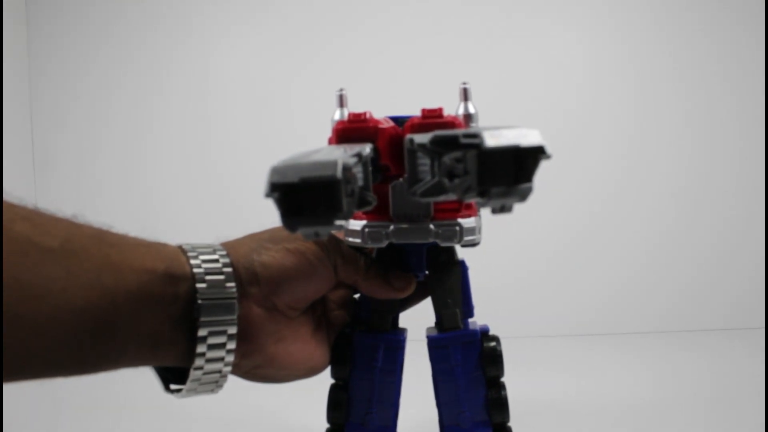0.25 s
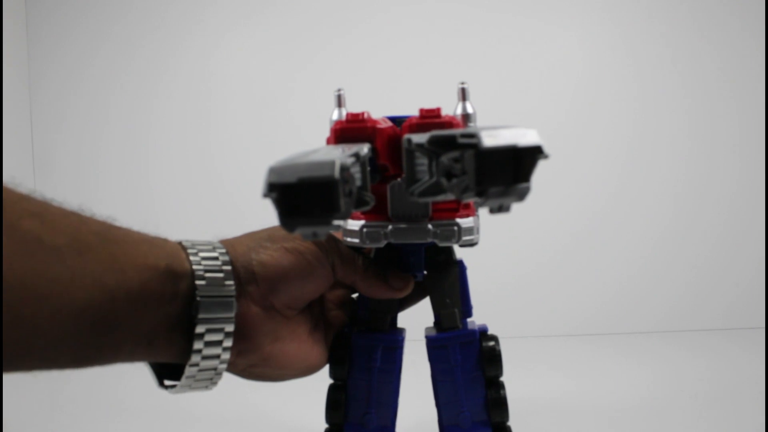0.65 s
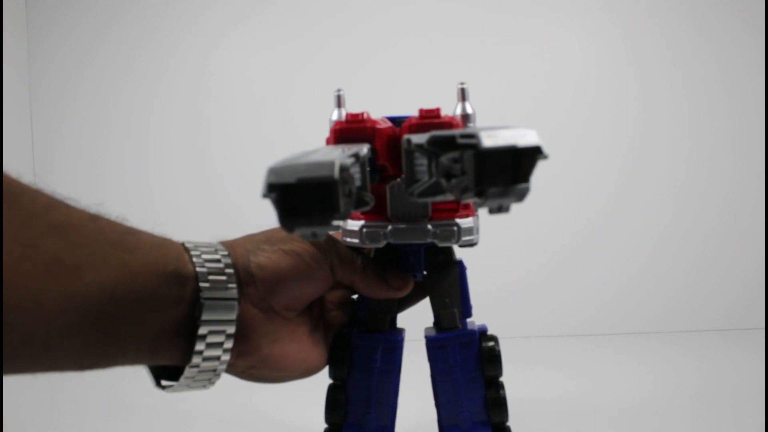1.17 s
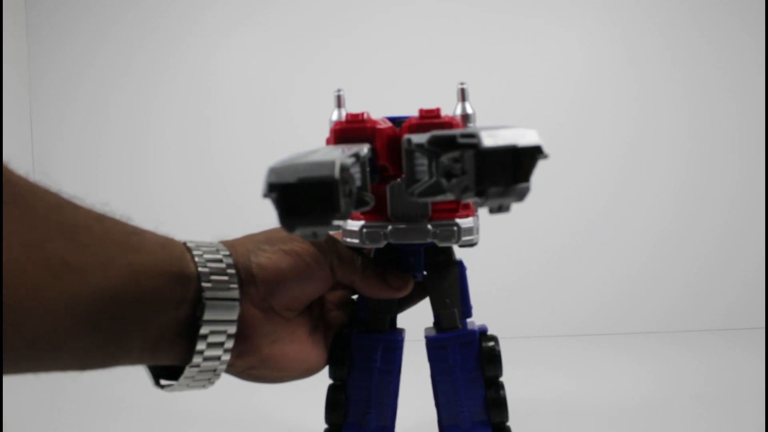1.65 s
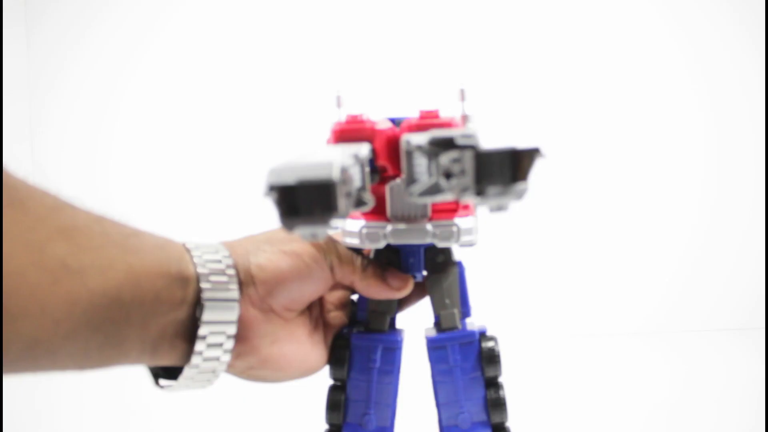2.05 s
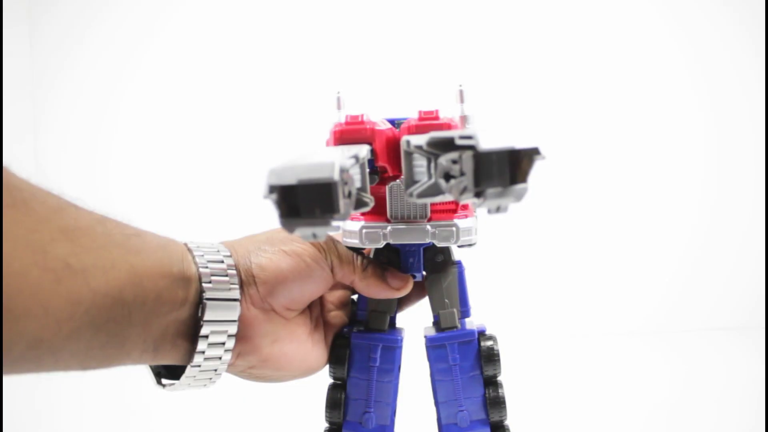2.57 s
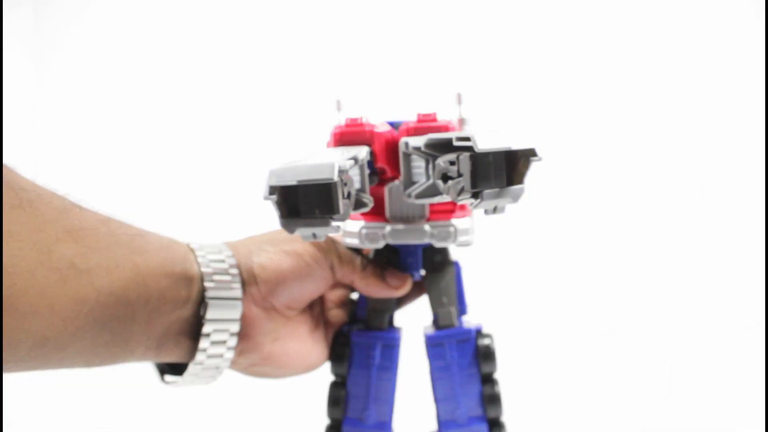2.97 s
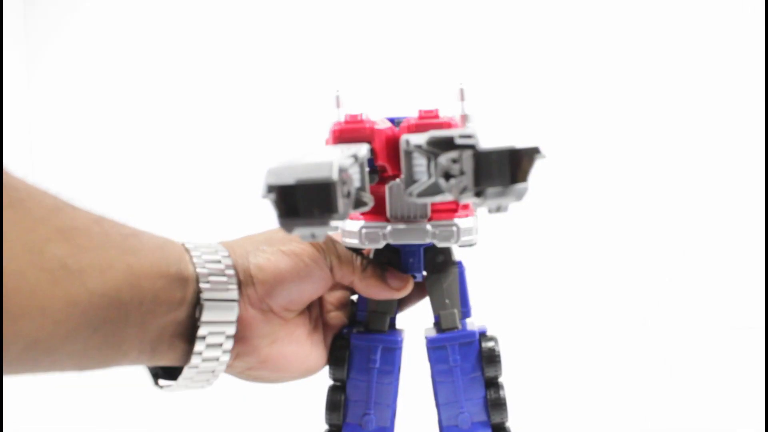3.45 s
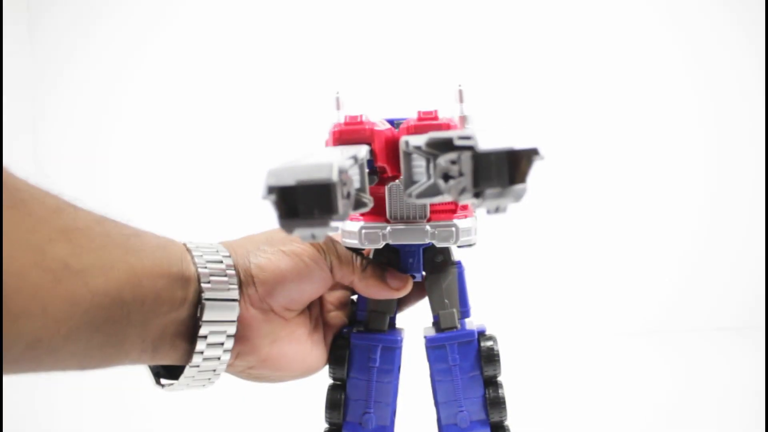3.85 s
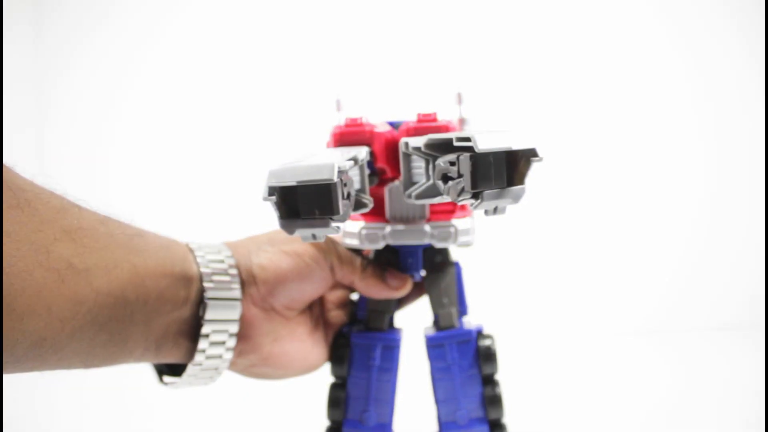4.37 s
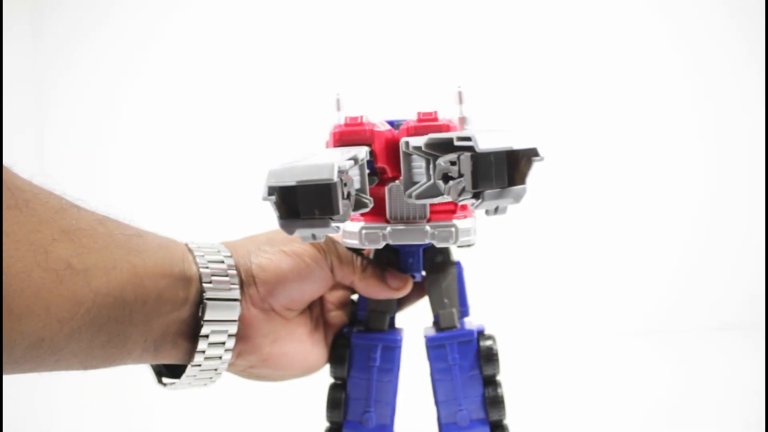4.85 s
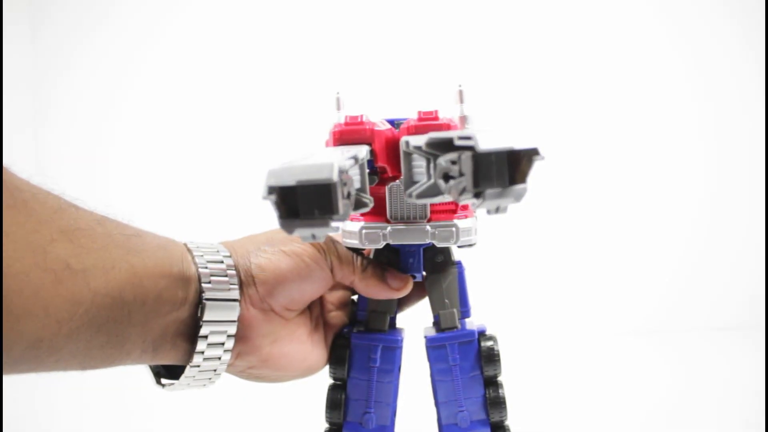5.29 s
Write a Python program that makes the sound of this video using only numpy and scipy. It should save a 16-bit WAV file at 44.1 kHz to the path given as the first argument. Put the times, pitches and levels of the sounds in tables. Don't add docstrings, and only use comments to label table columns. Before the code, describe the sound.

A loud plastic button snap, faint finger rubs, a switch click, then a small geared lens motor whirring and stuttering in a quiet room.

```python
import sys
import numpy as np
from scipy import signal
from scipy.fft import rfft, irfft, next_fast_len
from scipy.io import wavfile
from scipy.ndimage import uniform_filter1d, map_coordinates

SR = 44100
rng = np.random.default_rng(int(sys.argv[2]) if len(sys.argv) > 2 else 0)


def inscribe(sig):
    pcm = np.round(np.clip(np.atleast_2d(sig).T, -1, 1) * 32767)
    wavfile.write(sys.argv[1], SR, pcm.astype(np.int16))


def volts_from_decibels(level):
    exponent = np.asarray(level, float) / 20
    return 10 ** exponent


N = 243678
T = np.arange(N) / SR
TOP_HZ = 15500

# frequency in Hz, level in dB per Hz.
HUSH_SPECTRUM = [(15, -56.5), (25, -39.5), (87, -20.5), (130, -9.5), (196, -13), (355, -9.5), (386, -13),
                 (479, -10), (534, -12.5), (1080, -13), (5630, -23), (9950, -26.5), (12000, -27.5),
                 (13800, -22), (16200, -53)]
HUSH_DB = -68
# frequency in Hz, level in dB.
CLOCK_TONES = [(361, -82), (5000, -95), (6000, -93), (8000, -89), (9000, -89), (10000, -88), (11000, -92),
               (13000, -94), (14000, -90)]
# frequency in Hz, t60 in seconds.
ROOM_DECAY = [(150, 0.41), (1000, 0.23), (4000, 0.17), (12000, 0.15)]
WALLS_DB = -16.5
# start in seconds, end in seconds.
DROPOUTS_S = [
    (2.002, 2.022),
    (3.601, 3.622),
]

# time in seconds, middle in dB, body knock in dB, treble in dB.
SMALL_TICKS = [(.248, -50, -45.5, -42), (.642, -52.5, -59.5, -66.5), (.684, -49.5, -58, -66),
               (.708, -46.5, -64, -65), (.903, -58, -44, -48), (.979, -49, -57.5, -54),
               (1.714, -75.5, -72, -54.5), (1.81, -64.5, -47, -51), (1.814, -60, -68, -43.5),
               (1.841, -58, -70, -51), (1.849, -72, -68, -52), (1.887, -63, -64, -52),
               (1.938, -56, -54, -44), (2.026, -67, -56.5, -80), (2.272, -44, -44.5, -35),
               (2.773, -61.5, -45, -35.5), (2.784, -60, -41, -38), (3.952, -47, -52, -54),
               (4.595, -59.5, -51, -62), (4.683, -56, -55, -54.5), (3.175, -51, -48, -36),
               (3.182, -55, -60, -38), (3.194, -43, -30.5, -46), (3.808, -43, -60, -34.5),
               (4.442, -43.5, -42.5, -34.5), (5.411, -38, -44, -29.5), (5.513, -42.5, -50, -33),
               (.002, -59.5, -38, -61), (1.005, -54, -56, -62), (3.115, -46, -48, -66),
               (3.925, -59, -52, -72), (4.525, -64.5, -64, -76)]
# time in seconds, knock in dB, deep part in dB.
HOUSING_JOLTS = [
    (.249, -53, -54),
    (2.29, -39.5, -51),
    (2.778, -41.5, -78),
    (3.19, -39, -60),
    (3.825, -51, -57),
    (4.45, -61, -57),
    (5.43, -53, -56),
]

# time in seconds, peak in dB, rattle t60 in seconds, lead-in in dB, settling in dB.
BIG_SNAPS = [
    (.0112, 0, 0.014, -17.5, -17.5),
    (1.906, -17, 0.0059, -14.5, -32),
    (2.2869, -10.5, 0.023, -8.5, -16),
]
# lead-in before in seconds, build-up in seconds, rebound after in seconds, rebound in dB.
SNAP_CONTACTS = [
    (0.0014, 0.00035, 0.0022, -12.5),
    (.0005, 0.00035, .0078, -16),
    (.0015, 0.00025, 0.0022, -10),
]
# frequency in Hz, level in dB per Hz.
RATTLE_SPECTRA = [
    [(50, -40), (130, -4), (383, -10.5), (3160, -12), (4000, -8), (4820, -16.5), (5690, -18), (9310, -11.5),
     (13200, -17.5), (16300, -41)],
    [(120, -69), (200, -47), (615, -1), (1760, -23), (3060, -34.5), (4580, -31), (5720, -11), (6630, -33),
     (10700, -12.5), (16300, -59)],
    [(59, -74.5), (100, -48), (1500, -17), (2400, -5.5), (5390, -5), (7110, -12), (8990, -1), (13500, -33),
     (16300, -62)],
]
# frequency in Hz, level in dB, t60 in seconds.
BUTTON_MODES = [(350, -0.5, 0.011), (813, -8, 0.01), (1355, -14, 0.016), (1625, -7, 0.011),
                (2080, -8, 0.014), (2690, -9, 0.016), (3570, -1, 0.011), (3970, -3, 0.011),
                (5750, 4, 0.006), (7410, 5, 0.007), (9450, 9, 0.0064), (10470, -3, 0.0083),
                (11180, -7, .01), (13000, -5.5, 0.006)]
# frequency in Hz, level in dB, t60 in seconds.
SWITCH_MODES = [(528, 2.5, .014), (730, 9, 0.014), (955, 4, 0.0098), (1223, 17, 0.021), (1490, 2, 0.013),
                (1724, 19, 0.016), (2610, -3, 0.032), (3480, -3, 0.021), (5110, 4, 0.013), (5830, 3, 0.013),
                (9500, -12, .008), (10300, -9, .007)]
# frequency in Hz, level in dB, t60 in seconds.
STOP_MODES = [(1466, -3.5, 0.016), (2940, -7.5, 0.023), (3990, -4, 0.018), (5260, -6, 0.021),
              (6140, -1.5, 0.0085), (8850, 8, 0.0054), (10540, -5.5, 0.0076), (13100, 2, 0.0058)]

# time in seconds, rise in dB/s, fall in dB/s, hiss in dB, extra body in dB.
FINGER_SLIDES = [(.2, 244, 155, -62, 12), (.25, 298, 163, -61, 5), (0.297, 166.5, 1800, -57.5, -1),
                 (.955, 450, 182, -57, 0), (1.105, 600, 196, -70, 6), (1.154, 300, 602.5, -57, -2.5),
                 (1.276, 277, 335, -42, -1.5), (1.359, 150, 220, -61, 7), (1.445, 249, 302, -63.5, 5),
                 (1.53, 349, 116, -53.5, -3), (1.717, 350, 1999.5, -66, -3), (1.89, 900, 200, -70, -13),
                 (1.941, 282, 252.5, -54, 4), (3.627, 3000, 898, -72.5, 15)]
# frequency in Hz, level in dB per Hz.
SKIN_HISS_SPECTRUM = [(2000, -81), (3200, -26), (4700, -9.5), (5400, -4.5), (6450, -15.5), (8500, 0),
                      (10600, -3), (11500, -12), (14600, -8), (15500, -28.5)]
# frequency in Hz, level in dB per Hz.
SKIN_BODY_SPECTRUM = [(300, -70), (900, -3.5), (1500, 1), (2200, -3.5), (3000, -9), (4200, -9.5),
                      (5500, -44)]
# frequency in Hz, width in Hz, height in dB.
SHELL_PEAKS = [(1192, 30, 6.5), (1490, 80, 2), (2100, 68, -1), (5350, 260, 5), (10620, 440, 4.5),
               (14700, 320, -6)]
# frequency in Hz, level in dB per Hz.
GRIP_SPECTRUM = [(250, -64), (500, -18.5), (670, -9.5), (710, 1.5), (750, -8.5), (900, -31), (1200, -71.5)]
# time in seconds, rise in dB/s, fall in dB/s, level in dB, mode in Hz.
GRIP_HUMS = [
    (.235, 496, 300, -67, 713),
    (.295, 199.5, 1200, -57, 706),
    (1.251, 304, 160, -52, 1487),
    (1.272, 261, 500, -47, 713),
    (1.56, 121.5, 252, -60.5, 1198),
    (1.96, 201, 301, -63, 1200),
]
BODY_DB, BODY_GROWS = -57.5, 0.46
LIFT_DB = -70
ROUND_S = 0.0105

# start in seconds, end in seconds, take-up in seconds, low grind in dB, relative braking.
FORWARD_STROKES = [
    (2.267, 2.338, 0.0074, -43, 0.79),
    (2.87, 3.091, 0.033, -42.5, 1.12),
    (3.8, 3.875, 0.019, -41.5, 0.85),
    (3.937, 4.006, 0.028, -41, 0.97),
    (4.069, 4.112, 0.023, -42.5, 0.86),
    (5.407, 5.45, 0.0079, -40.5, 0.8),
    (5.509, 5.518, 0.012, -38.5, 0.9),
]
# start in seconds, end in seconds, take-up in seconds, low grind in dB, relative braking.
BACKWARD_STROKES = [
    (3.168, 3.476, 0.016, -41, 1.45),
]
# start in seconds, end in seconds, take-up in seconds, low grind in dB, relative braking.
JERK_STROKES = [
    (2.769, 2.786, 0.0065, -42.5, 1.82),
    (4.435, 4.452, 0.013, -41.5, 0.94),
]
# time in seconds, take-up in seconds, hold in seconds, low grind in dB.
FOCUS_NUDGES = [(4.563, 0.033, 0.027, -50.5), (4.665, 0.025, 0.024, -50), (4.798, 0.028, 0.022, -49),
                (4.899, 0.027, 0.02, -49), (4.997, 0.033, 0.023, -49.5), (5.096, 0.029, 0.023, -48.5),
                (5.194, 0.034, 0.018, -49.5), (5.292, 0.037, .022, -50.5)]
NUDGE_BRAKE = 1.6
# frequency in Hz, level in dB per Hz.
GRIND_SPECTRUM = [(29, -73), (50, -20), (130, -28.5), (382, -23.5), (607, -14), (693, -8.5), (817, -16),
                  (1480, -9), (2600, -25), (3380, -66), (5720, -120)]
# frequency in Hz, level in dB per Hz.
CHATTER_SPECTRUM = [(1180, -28.5), (2000, -10.5), (2750, -3), (3140, -5.5), (3920, -6.5), (4250, -5),
                    (5750, -10.5), (8000, -16), (10400, -111), (17600, -120)]
# frequency in Hz, level in dB per Hz.
RASP_SPECTRUM = [(3820, -22), (6500, -7), (8350, -7.5), (8790, -9), (10800, -2.5), (11500, -9.5),
                 (13500, -3), (15500, -21)]
# frequency in Hz, width in Hz, height in dB.
BARREL_PEAKS = [(775, 360, 4), (1145, 57, 8.5), (1727, 920, 14), (2767, 355, 11.5), (3880, 450, 10),
                (5420, 1060, 9), (8970, 250, 16), (9850, 300, 8), (10650, 220, 14), (12700, 400, -1),
                (13260, 390, 1.5), (2390, 59, 5.5)]
# frequency in Hz, width in Hz, height in dB.
HOUSING_DIPS = [(7080, 180, 1), (8450, 300, -2), (10200, 100, -6), (11250, 250, -14), (14000, 300, -10)]
# frequency in Hz, width in Hz, height in dB.
BARREL_SEATING = [
    [(405, 110, 2), (1550, 380, -1.5), (4400, 290, -4), (5290, 210, 3), (5900, 340, 3.5), (9800, 380, -5.5),
     (13300, 900, -5)],
    [(780, 130, -7), (2360, 49, 2), (5280, 500, -3.5), (9870, 200, 5), (11600, 540, 6), (13400, 500, 2.5)],
    [(620, 200, 6), (1410, 250, 4), (1880, 330, -3.5), (2720, 290, -9.5), (3500, 190, 2), (3840, 240, -3),
     (7700, 1300, 5.5), (9900, 600, 5)],
    [(724, 120, 3.5), (1610, 300, 1), (4030, 400, 2.5), (5700, 570, 4), (9000, 270, -3), (10630, 230, -2)],
]
WEAK_DB, FULL_DB = (-1, -9.5, -18.5), (0, 3, 0)
SPIN_UP_DB, SPIN_UP_S = (-3.5, -6, -13), (0.017, 0.023, 0.045)
COAST_DB_PER_S = (-400, -620, -950)
LOAD_DB, LOAD_GROWS = -41, (0, 0.03, 0.34)
STOP_S, STOP_DB_PER_S = 0.046, -900
TAKE_UP_DB, TAKE_UP_BEND = -31, 1.76
WHEEL_RATIO, WHEEL_DB, WHEEL_S = 5.2, -6.5, 3.303

# start in seconds, end in seconds, top speed in turns Hz, 3rd order in dB, upper orders in dB.
FREE_SPINS = [
    (2.886, 3.091, 234, -45, -55),
    (3.19, 3.476, 223.6, -42, -43),
    (3.817, 3.87, 240, -34, -44),
    (3.951, 4.006, 237, -37, -40),
    (4.066, 4.118, 245, -42, -52),
]
# multiple of the shaft speed, level in dB against the 5th order.
WEAKER_ORDERS = [(4, -9), (7, -16), (8, -10.5), (9, -13.5), (12, -8), (15, -5.5), (18, -8)]
LAG, SPEED_UP_S = .4, .036
SLOW_THIRD_DB, SLOW_FIFTH_DB = -135, -105
FADE_DB_PER_S, CUT_DB_PER_S = -700, -1400
LIGHT_S, GLIDE_DB_PER_S = .1, -480
MOUNT_HZ, MOUNT_WIDTH_HZ, OFF_MOUNT_DB = 1200, 240, -14


def unit(x):
    return x / np.sqrt(np.mean(x ** 2) + 1e-20)


def along(points, hz):
    f, v = np.transpose(points)
    return np.interp(np.log(hz + 1), np.log(f + 1), v)


def humps(hz, peaks):
    return sum(db / (1 + (2 * (hz - c) / w) ** 2) for c, w, db in peaks)


def wobble(rate):
    knots = rng.standard_normal(int(N * rate / SR) + 4)
    return map_coordinates(knots, [T * rate])


def filtered(x, response):
    m = next_fast_len(len(x) + SR)
    return irfft(rfft(x, m) * response(np.fft.rfftfreq(m, 1 / SR)), m)[:len(x)]


def coloured(x, spectrum, peaks=()):
    return unit(filtered(x, lambda f: volts_from_decibels(along(spectrum, f) + humps(f, peaks)) * (f < TOP_HZ)))


def burst(spectrum, t60, size=4096):
    cep = irfft(np.log(volts_from_decibels(along(spectrum, np.fft.rfftfreq(size, 1 / SR))) + 1e-6), size)
    cep[1:size // 2] *= 2
    cep[size // 2 + 1:] = 0
    noise = rng.standard_normal(size) * volts_from_decibels(-60 * T[:size] / t60)
    puff = irfft(rfft(noise) * np.exp(rfft(cep)), size)
    return puff / np.abs(puff).max()


def add(track, s, sound):
    part = track[round(s * SR):][:len(sound)]
    part += sound[:len(part)]


def room(x):
    hz, t, z = signal.stft(rng.standard_normal(SR // 2), SR, nperseg=256)
    decay = volts_from_decibels(-60 * t / along(ROOM_DECAY, hz)[:, None])
    tail = signal.istft(z * decay, SR, nperseg=256)[1]
    return signal.fftconvolve(x, tail / np.linalg.norm(tail))


def hush():
    tones = sum(np.sqrt(2) * volts_from_decibels(db + 0.7 * wobble(1.2)) * np.sin(2 * np.pi * hz * T) for hz, db in CLOCK_TONES)
    level = volts_from_decibels(HUSH_DB + 0.82 * wobble(1.88))
    return level * coloured(rng.standard_normal(N), HUSH_SPECTRUM) + tones


def ticks():
    middle = [(1300, -23.0), (2000, -10.5), (3300, -11.0), (4500, -35.0)]
    body = [(300, -31), (600, 4.5), (1200, 8), (1600, 13), (1900, 5.0), (2300, -30.5)]
    treble = [(4500, -38.5), (5600, 7.5), (6800, -7.5), (9500, 8.5), (14000, -31), (16000, -72)]
    deep = [(40, -48), (90, -4.5), (170, -3), (280, -4.5), (500, -40)]
    knock = [(60, -60), (170, -31), (280, -11.5), (380, -1.5), (520, -7), (800, -20), (1500, -37)]
    out = np.zeros(N)
    for s, db, knock_db, treble_db in SMALL_TICKS:
        add(out, s, volts_from_decibels(db) * burst(middle, t60=0.032))
        add(out, s, volts_from_decibels(knock_db) * burst(body, t60=0.045))
        add(out, s, volts_from_decibels(treble_db) * burst(treble, t60=0.026))
    for s, db, deep_db in HOUSING_JOLTS:
        add(out, s, volts_from_decibels(deep_db) * burst(deep, t60=0.034))
        add(out, s, volts_from_decibels(db) * burst(knock, t60=0.014))
    return filtered(out, lambda f: f < TOP_HZ)


def snaps():
    out, t = np.zeros(N), T[:4096]
    parts = zip(BIG_SNAPS, SNAP_CONTACTS, (BUTTON_MODES, SWITCH_MODES, STOP_MODES), RATTLE_SPECTRA)
    for (s, db, t60, lead_db, settle_db), (lead_s, build_s, back_s, back_db), modes, crack in parts:
        ring = sum(volts_from_decibels(level - 60 * t / ring_t60) * np.sin(2 * np.pi * hz * t + k * k)
                   for k, (hz, level, ring_t60) in enumerate(modes))
        ring *= (1 - np.exp(-t / build_s)) ** 2
        ring /= np.abs(ring).max()
        rattle = volts_from_decibels(db - 7.0) * burst(crack, t60)
        settling = volts_from_decibels(db + settle_db) * burst(crack, t60=0.038)
        add(out, s - lead_s, volts_from_decibels(db + lead_db) * burst(crack, t60=0.014))
        add(out, s, volts_from_decibels(db) * ring + rattle + settling)
        add(out, s + back_s, volts_from_decibels(db + back_db) * ring)
        add(out, s, volts_from_decibels(WALLS_DB) * room(rattle[:SR // 600]))
    return filtered(out, lambda f: (1j * f / (1j * f + 130)) ** 3)


def swell(s, rise, fall, db):
    gain = volts_from_decibels(db - np.where(T < s, rise, fall) * (np.hypot(T - s, ROUND_S) - ROUND_S))
    return gain * gain / (gain + volts_from_decibels(LIFT_DB))


def finger():
    slides = [swell(*row[:-1]) for row in FINGER_SLIDES]
    hiss = sum(slides)
    press = sum(volts_from_decibels(row[-1]) * slide for row, slide in zip(FINGER_SLIDES, slides))
    body = volts_from_decibels(BODY_DB) * (press / volts_from_decibels(-51.5)) ** BODY_GROWS
    body *= press / (press + volts_from_decibels(LIFT_DB))
    slips = volts_from_decibels(1.25 * wobble(400) + 1.5 * wobble(46.1)) * rng.standard_normal((3, N))
    out = hiss * coloured(slips[0], SKIN_HISS_SPECTRUM, SHELL_PEAKS)
    out += body * coloured(slips[1], SKIN_BODY_SPECTRUM)
    for *touch, mode_hz in GRIP_HUMS:
        cavity = [(f - 710 + mode_hz, db) for f, db in GRIP_SPECTRUM]
        out += swell(*touch) * coloured(slips[2], cavity)
    return out


def strokes():
    out = np.zeros((4, 3, N))
    weak, full, grows, coast, short, tau = (
        np.array(v)[:, None] for v in (WEAK_DB, FULL_DB, LOAD_GROWS, COAST_DB_PER_S, SPIN_UP_DB, SPIN_UP_S))
    rows = []
    for gains, table in zip(out, (FORWARD_STROKES, BACKWARD_STROKES, JERK_STROKES)):
        for s, cut, take_up, db, brake in table:
            rows.append((gains, s, take_up, cut, db + full + grows * (db - LOAD_DB), brake, short))
    for s, take_up, hold, db in FOCUS_NUDGES:
        rows.append((out[-1], s, take_up, s + take_up + hold, db + weak, NUDGE_BRAKE, 0))
    for gains, s, take_up, cut, db, brake, slow_db in rows:
        part = slice(round(s * SR), round((cut + .15) * SR))
        t = T[part] - s
        coast_s = brake * np.clip(T[part] - cut, 0, 1)
        mesh_db = TAKE_UP_DB * np.clip(1 - t / take_up, 0, 1) ** TAKE_UP_BEND
        friction_db = STOP_DB_PER_S * np.clip(coast_s - STOP_S, 0, 1)
        gains[:, part] += volts_from_decibels(db + mesh_db + friction_db + slow_db * np.exp(-t / tau) + coast * coast_s)
    return out


def spins():
    out = np.tile([[200.], [-120], [-120], [-120]], N)
    for s, cut, top_hz, third_db, upper_db in FREE_SPINS:
        part = slice(round(s * SR), round((cut + .07) * SR))
        slow = LAG * np.exp(-(T[part] - s) / SPEED_UP_S)
        turns_hz = top_hz * (1 - slow)
        unpowered_s = np.clip(T[part] - cut, 0, 1)
        on_db = CUT_DB_PER_S * unpowered_s + FADE_DB_PER_S * np.clip(s + 0.029 - T[part], 0, 1)
        glide_db = (cut - s < LIGHT_S) * (GLIDE_DB_PER_S - CUT_DB_PER_S) * unpowered_s
        mount = 1 / (1 + (2 * (6 * turns_hz - MOUNT_HZ) / MOUNT_WIDTH_HZ) ** 2)
        out[:, part] = [turns_hz,
                        third_db + on_db + glide_db + SLOW_THIRD_DB * slow,
                        upper_db + on_db + SLOW_FIFTH_DB * slow,
                        upper_db + on_db + OFF_MOUNT_DB * (1 - mount)]
    return out


def gears(phase):
    teeth = volts_from_decibels(.7 * np.cos(phase) + 1.3 * wobble(900))
    layers = [volts_from_decibels(0.82 * wobble(50)) * coloured(teeth * rng.standard_normal(N), colour, BARREL_PEAKS + HOUSING_DIPS)
              for colour in (GRIND_SPECTRUM, CHATTER_SPECTRUM, RASP_SPECTRUM)]
    gains = strokes()
    wheel_phase = (phase - phase[round(WHEEL_S * SR)]) / WHEEL_RATIO
    gap = np.cos(wheel_phase / 2 + .3 * wobble(35)) ** 4
    gains[1, 2] *= volts_from_decibels(WHEEL_DB * gap + 2)
    return sum(filtered((gain * layers).sum(axis=0), lambda f: volts_from_decibels(humps(f, seat)))
               for gain, seat in zip(gains, BARREL_SEATING))


def shaft_song(phase, third_db, fifth_db, sixth_db):
    def order(k, db):
        level = uniform_filter1d(volts_from_decibels(db + 1.13 * wobble(9 * k)), size=200)
        return np.sqrt(2) * level * np.sin(k * phase)

    fifth = order(5, fifth_db)
    song = order(3, third_db) + fifth + order(6, sixth_db)
    song += sum(order(k, fifth_db + db) for k, db in WEAKER_ORDERS)
    ring_hz, width_hz = 1114, 1.8
    ring = filtered(fifth, lambda f: 1j * f * width_hz / (ring_hz ** 2 - f * f + 1j * f * width_hz))
    return song + volts_from_decibels(-18) * ring


def motor():
    turns_hz, third_db, fifth_db, sixth_db = spins()
    phase = 2 * np.pi * np.cumsum(turns_hz * (1 + 0.00296 * wobble(80))) / SR
    running = gears(phase) + shaft_song(phase, third_db, fifth_db, sixth_db)
    return filtered(running, lambda f: 1 / (1 + (95 / (f + 1)) ** 6))


def scene():
    running = motor()
    echo = volts_from_decibels(-22.5) * room(running)[:N]
    return (hush() + ticks() + snaps() + finger() + running + echo)[None]


def band_limit(x):
    return signal.sosfilt(signal.butter(12, 16490, fs=SR, output="sos"), x)


def record(dry):
    lost = uniform_filter1d(sum((T > a) & (T < b) for a, b in DROPOUTS_S) * 1., size=40)
    dull = volts_from_decibels(-6.0) * filtered(dry[0], lambda f: 1 / (1 + 1j * f / 2500))
    mix = (1 - lost) * dry + lost * dull
    mix = mix / (1 + np.abs(mix / 1.05) ** 6) ** (1 / 6)
    mix = filtered(mix[0], lambda f: 1 / (1 + (f / 16100) ** 40))[None]
    return band_limit(mix)


dry = scene()
out = record(dry)
inscribe(out)
```